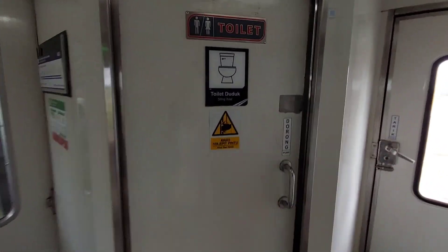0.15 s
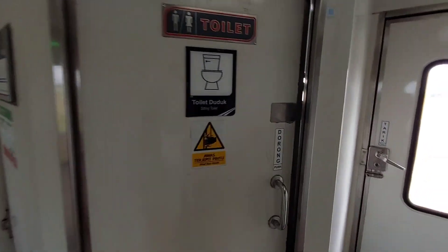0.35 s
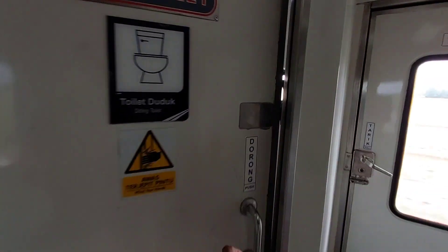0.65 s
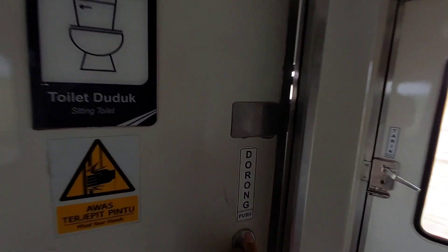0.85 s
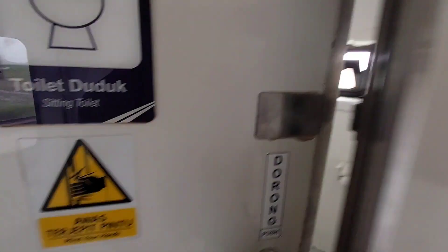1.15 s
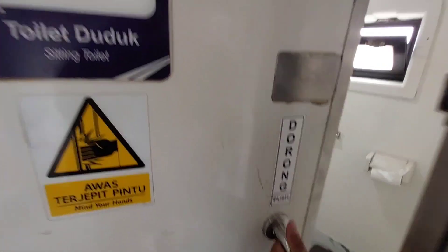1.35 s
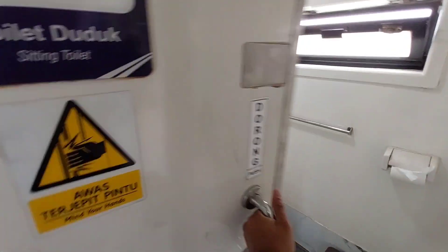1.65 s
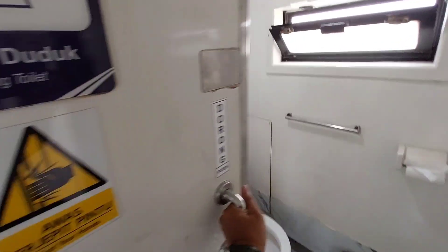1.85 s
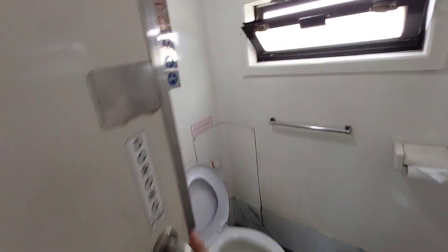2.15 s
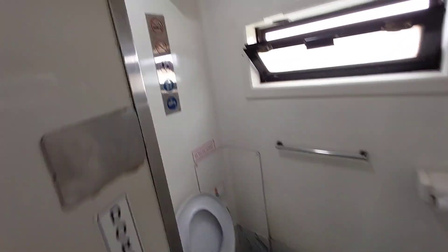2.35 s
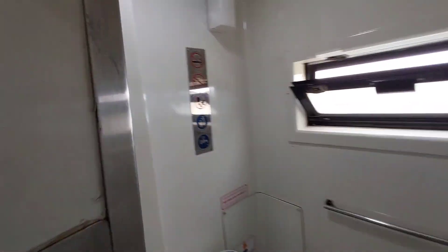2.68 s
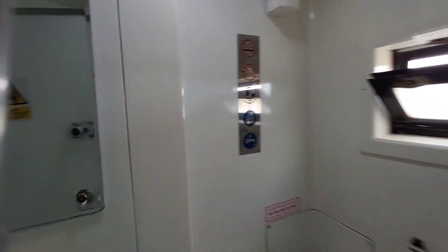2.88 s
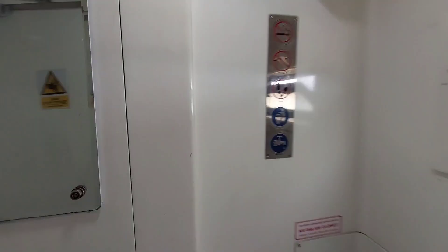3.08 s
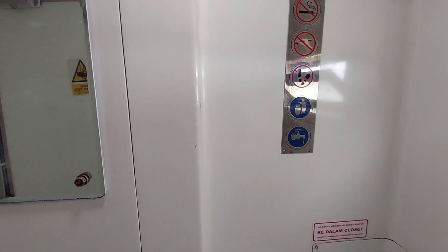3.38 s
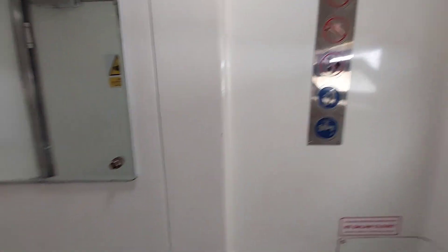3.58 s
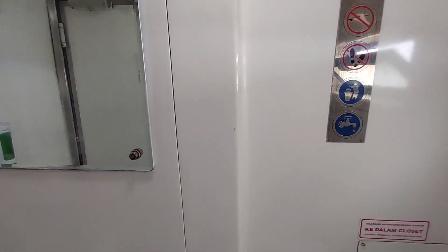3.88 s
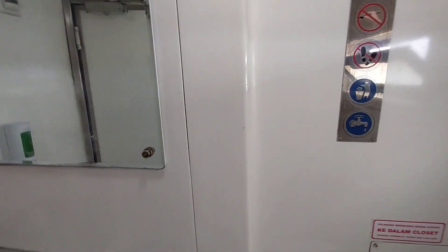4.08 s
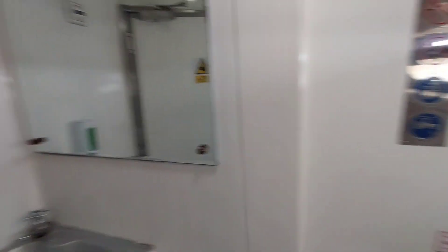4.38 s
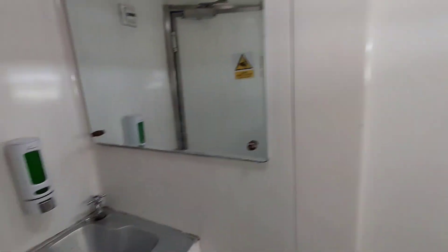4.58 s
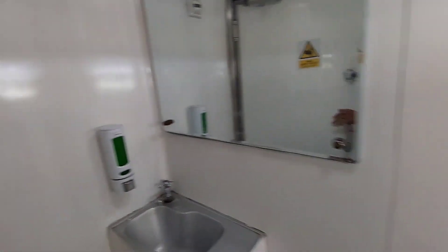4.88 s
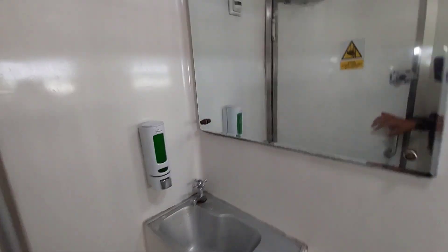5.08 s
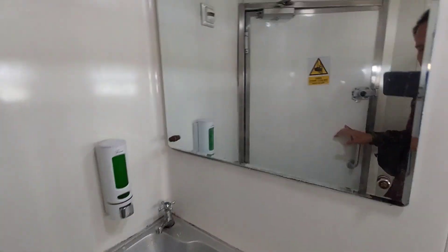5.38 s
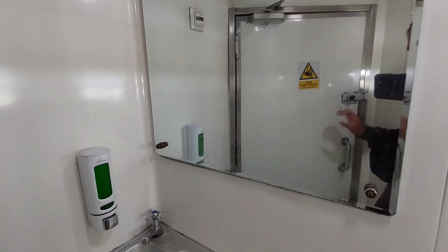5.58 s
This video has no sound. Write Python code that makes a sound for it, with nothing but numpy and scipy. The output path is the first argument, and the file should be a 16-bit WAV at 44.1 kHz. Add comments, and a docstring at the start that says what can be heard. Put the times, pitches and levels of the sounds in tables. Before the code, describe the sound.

Inside a moving train, wheels roar and panels thud and rattle as someone pushes through a toilet door, then a steel latch snaps sharply.

```python
"""A train runs on throughout: wheels roar, wall panels drone, the car body booms under the floor.
Jolts thud in the panels and rattle steel fittings; rubs and drags of a door come and go from the start.
From 2.0 to 2.75 s the listener walks from the vestibule into the toilet cubicle: the boom grows, a rustle
sets in and the room briefly sings. From 3.4 s a steel latch snaps now and then in the small hard room.
Shaped noise makes all but the singing and the latch ring, which are sines; two ports pick it up."""
import sys
import numpy as np
from scipy import signal
from scipy.fft import rfft, irfft
from scipy.io import wavfile
from scipy.ndimage import uniform_filter1d, minimum_filter1d

SR = 44100
rng = np.random.default_rng(int(sys.argv[2]) if len(sys.argv) > 2 else 0)


def wav_out(sig):
    """Save sig, one row per channel (or a flat mono array), as 16-bit PCM at SR to the path in sys.argv[1]."""
    wavfile.write(sys.argv[1], SR, np.round(np.clip(np.atleast_2d(sig).T, -1, 1) * 32767).astype(np.int16))


N = 252693
TIME = np.arange(N) / SR
HIT = TIME[:SR * 3 // 4]  # time axis of one short event


# Track roughness as the walls feel it. Each row: time in seconds, level in dB before drone_db.
TRACK_DB = [(0.0, -21.5), (0.29, -23), (1.39, -22), (1.53, -15), (2.42, -23), (3.11, -28), (3.57, -25),
            (3.88, -32), (4.15, -43), (4.29, -22), (4.76, -27.5), (5.73, -26)]
# Wheel roar, lower as the outer door is left behind. Each row: time in seconds, level in dB before roar_db.
ROAR_DB = [(0.0, -31.5), (0.64, -30), (2.62, -36.5), (4.48, -35), (5.33, -37), (5.73, -35)]
# Spectrum of the wheel roar. Each row: frequency in Hz, density in dB per Hz.
ROAR_COLOUR = [(40, -15), (120, -0.5), (420, 2.5), (700, 1.5), (1000, -0.5), (1400, -4.5), (1850, -7),
               (2120, 1), (2650, -5.5), (3300, -15.5), (5500, -19.5), (7000, -28.5), (9500, -32),
               (16000, -35)]


def running(drone_db=-0.5, roar_db=7, flutter_db=1.0, flutter_per_s=28):
    """The track shakes the wall panels; the wheel roar flutters over them."""
    inside = place(TIME)
    vestibule = diffuse(panels(0, N), N)
    cubicle = diffuse(panels(1, N), N)
    crossfade = np.sqrt(1 - inside) * vestibule + np.sqrt(inside) * cubicle
    drone = steadied(crossfade, 0.19) * curve(TRACK_DB)
    flutter = undb(flutter_db * walk(flutter_per_s))
    roar = diffuse(undb(along(ROAR_COLOUR, N)), N) * curve(ROAR_DB) * flutter
    return undb(drone_db) * drone + undb(roar_db) * roar


# Wall panels. Each row: frequency in Hz, half-width at half gain in Hz, relative level in dB in the
# vestibule, relative level in dB in the cubicle.
PANELS = [(93.7, 6.7, -3.5, 0), (153.1, 13.2, 0.5, -8.5), (187.4, 23.4, -3.5, -16.5), (243, 7.4, -2, -5),
          (263, 22, 0.5, -1), (289.7, 5.4, 2, 4), (315.6, 19, 0, -21), (348, 31, -8.5, -3),
          (430, 6.1, -31, -3), (640, 43, -19, -43), (917, 207, -27, -27.5)]


def panels(inside, n):
    """Wall resonances at a place between the vestibule (0) and the cubicle (1)."""
    modes = [(hz, width_hz, out_db + inside * (in_db - out_db)) for hz, width_hz, out_db, in_db in PANELS]
    return resonances(modes, n)


# Walk through the doorway. Each row: time in seconds, share of the cubicle from 0 to 1.
DOORWAY_WALK = [(0, 0), (2.0, 0), (2.75, 0.99), (5.73, 1)]


def place(s):
    """Share of the cubicle at time s."""
    return np.clip(np.interp(s, *np.transpose(DOORWAY_WALK)), 0, 1)


# Bending of the car body. Each row: frequency in Hz, half-width at half gain in Hz, relative level in dB.
BODY_MODES = [(54.8, 6.5, -3), (70.4, 1.7, 0), (106.7, 28.3, -11.5)]


def body_boom(vestibule_db=-34.5, cubicle_db=-22.5):
    """Bending modes of the car body boom under the floor, louder in the small cubicle."""
    level_db = vestibule_db + (cubicle_db - vestibule_db) * np.sqrt(place(TIME))
    return steadied(diffuse(resonances(BODY_MODES, N), N), 0.31) * undb(level_db)


# Jolts. Each row: start in seconds, panel thud in dB, thud centre in Hz, steel clank in dB,
# length of the chatter in seconds.
JOLTS = [(.15, -19, 280, -45, 0.023), (.57, -24.5, 400, -21, 0.028), (.645, -18, 960, -16, 0.052),
         (0.751, -15, 307, -23, 0.019), (.826, -17.5, 950, -15, .04), (.885, -22, 790, -23, .03),
         (1.322, -14, 187, -23.5, 0.017), (1.366, -9.5, 287, -18.5, 0.059), (1.54, -15.5, 327, -19, .041),
         (1.805, -12, 274, -18.5, 0.032), (1.882, -9.5, 243, -15.5, 0.042), (2.072, -11.5, 300, -21, 0.016),
         (2.278, -15, 330, -47, 0.034), (2.671, -13, 254, -27, 0.012), (2.87, -17, 242, -43, 0.0061),
         (3.374, -26, 805, -24, 0.016), (3.411, -17.5, 290, -32, 0.034), (3.645, -21, 326, -25.5, 0.027),
         (4.103, -13, 383, -33, .012), (4.177, -11, 402, -17, 0.032), (4.273, -17, 280, -30, .02),
         (4.41, -21.5, 182, -30, 0.058), (5.03, -21.5, 320, -26.5, 0.033),
         (5.116, -10.5, 280, -28.5, 0.018)]
# Spectrum of the steel fittings. Each row: frequency in Hz, density in dB per Hz.
CLANK_COLOUR = [(150, -30), (450, 10.5), (580, 4), (850, 4), (1230, -9), (1800, -6), (2200, 0.5),
                (2700, -10.5), (3400, -19.5), (5500, -28), (8000, -36.5), (16000, -40)]


def jolts(thud_t60_s=0.23, room_t60_s=0.45, reach_octaves=0.66):
    """Each jolt thuds in the panels near its own pitch and makes steel fittings chatter into the room."""
    out, n = np.zeros((2, N)), len(HIT)
    for s, thud_db, hz, clank_db, length_s in JOLTS:
        nearness = np.exp(-.5 * (np.log2(bins(n) / hz) / reach_octaves) ** 2)
        excited = panels(place(s), n) * nearness
        # build up for half the chatter, hold to its end, ring out
        build_up = np.minimum(HIT / length_s * 2, 1)
        ring_out = np.minimum(fade(thud_t60_s) * undb(60 * length_s / thud_t60_s), 1)
        thud = steadied(diffuse(excited, n), 0.021) * build_up * ring_out
        steel = diffuse(undb(along(CLANK_COLOUR, n)), n) * fade(room_t60_s)
        clank = unit_peak(signal.fftconvolve(steel, chatter(length_s))[:, :n])
        add(out, s, undb(thud_db) * thud + undb(clank_db) * clank)
    return out


def chatter(length_s, count=40):
    """Contact force of a loose part: a flurry of blows that grow weaker."""
    force = np.zeros(int(length_s * SR) + 1)
    when = (np.arange(count) + rng.random(count)) / count
    blows = rng.standard_normal(count) * (1 - .5 * when)
    force[(when * length_s * SR).astype(int)] = blows
    return force[None]


# Latch and bolt. Each row: start in seconds, level in dB, brightness in dB per octave,
# ring in dB re level, direct crack in dB re level.
LATCH_SNAPS = [(3.374, -13.5, -7, -28, -14), (3.414, -9, 1, -25, -5), (3.422, -19.5, -3.5, -25, -16),
               (3.676, -23.5, -0.5, -19, -2), (3.7227, -13, 0, -11, -4), (4.472, -32, 7, -31, 3),
               (5.6365, -26, 5, -32, 7.5)]
# Spectrum of a snap. Each row: frequency in Hz, density in dB per Hz.
LATCH_COLOUR = [(300, -1), (1500, -3.5), (2400, 0), (3700, -5.5), (5300, -2), (6800, -5.5), (8300, -1.5),
                (12000, -4), (14300, -11), (15500, -11.5)]
# Ring of the latch steel. Each row: frequency in Hz, level in dB, t60 in seconds.
LATCH_MODES = [(4900, -7, 0.37), (5518, -10, .39), (8344, -8, .24), (9555, -7, 0.36), (11100, -6, .28),
               (11260, -8, .24), (12400, -6, .25), (13670, -3, .26), (15230, -9, .26)]


def latch(tail_t60_s=0.25, crack_t60_s=0.0061, uneven_db=4.0):
    """Steel snaps on steel: a crack, a short ring and dense reflections off the cubicle walls."""
    out, n = np.zeros((2, N)), len(HIT)
    octaves = np.log2(np.maximum(bins(n), 1000) / 8000)
    for s, db, tilt_db, ring_db, crack_db in LATCH_SNAPS:
        # every contact point favours other modes of the lock case
        uneven = uneven_db * ripple(n, 150.0, channels=1)
        colour = undb(along(LATCH_COLOUR, n) + tilt_db * octaves + uneven)
        walls = diffuse(colour, n) * fade(tail_t60_s)
        # one channel: the direct crack reaches both ports alike
        crack = diffuse(colour, n)[0] * fade(crack_t60_s)
        ring = np.zeros((2, n))
        for hz, mode_db, t60_s in LATCH_MODES:
            ring += undb(mode_db) * fade(t60_s) * np.sin(2 * np.pi * (hz * HIT + rng.random((2, 1))))
        add(out, s, undb(db) * (walls + undb(crack_db) * crack + undb(ring_db) * ring))
    return out


# Door on its frame. Each row: start in seconds, level in dB, length in seconds.
DRAGS = [(0.795, -32, 0.22), (1.267, -31, 0.086), (1.787, -31.5, 0.22), (2.034, -28, 0.25),
         (4.34, -30.5, 0.23)]
# Ring of the dragging door. Each row: frequency in Hz, half-width at half gain in Hz, relative level in dB.
DOOR_MODES = [(2050, 160, -3), (2490, 250, -2), (3900, 1100, -18.5)]


def drags(grain_db=2, grain_per_s=110):
    """The door slips in small jerks along its frame and rings in its own modes."""
    rasp = diffuse(resonances(DOOR_MODES, N), N) * undb(grain_db * walk(grain_per_s))
    speed = np.zeros(N)
    for s, db, length_s in DRAGS:
        speed += undb(db) * np.sin(np.pi * np.clip((TIME - s) / length_s, 0, 1))
    return rasp * speed


# Strokes of clothes and hand on the door. Each row: start in seconds, level in dB,
# length before release in seconds.
RUBS = [(0, -33.5, 0.12), (0.583, -41, 0.33), (2.26, -38.5, 0.088), (2.684, -40.5, 0.18),
        (3.43, -33.5, 0.22), (4.097, -34.5, 0.32), (4.17, -30, 0.041), (4.35, -38, 0.055),
        (4.855, -45, 0.092), (5.19, -46, 0.075)]
# Spectrum of the rubbing. Each row: frequency in Hz, density in dB per Hz.
RUB_COLOUR = [(500, 6.5), (2400, 10.5), (3800, 5.5), (5800, 2), (7500, -3.5), (9500, -10), (12000, -4.5),
              (16000, -23)]


def rubbing(attack_s=0.023, release_s=0.078, rustle_db=-42.5, grain_db=1.0, grain_per_s=90):
    """Uneven dry friction: separate strokes over a faint rustle that comes with the cubicle."""
    pressure = undb(rustle_db) * place(TIME)
    for s, db, length_s in RUBS:
        attack = np.clip((TIME - s) / attack_s, 0, 1)
        release = np.exp(-np.maximum(TIME - s - length_s, 0) / release_s)
        pressure = pressure + undb(db) * attack * release
    grain = undb(grain_db * walk(grain_per_s))
    return diffuse(undb(along(RUB_COLOUR, N)), N) * pressure * grain


# Standing waves. Each row: start in seconds, frequency in Hz, level in dB, length in seconds.
SWELLS = [(2.2, 65.2, -13.5, 0.14), (2.249, 237, -18, 0.15), (2.426, 246.6, -19, 0.24),
          (3.261, 69, -18.5, 0.16), (4.387, 56.2, -18, 0.13)]


def swells():
    """Air in the small room sings briefly at one of its own pitches."""
    out = np.zeros((2, N))
    for s, hz, db, length_s in SWELLS:
        arch = np.sin(np.pi * np.minimum(HIT / length_s, 1))
        tone = np.sqrt(2) * np.sin(2 * np.pi * (hz * HIT + rng.random((1, 1))))
        add(out, s, undb(db) * arch * tone)
    return out


def hard_walls(x, depth_db=1.48):
    """Close hard walls comb the middle and treble, differently at each port."""
    depth = depth_db * np.clip(bins(N) / 400 - .5, 0, 1)
    return irfft(rfft(x) * undb(depth * ripple(N, 22)), N)


def ripple(n, spacing_hz, channels=2):
    """Random peaks and dips along frequency, as dense modes make them; spread near 1."""
    knots = np.arange(0, SR / 2, spacing_hz)
    heights = 1.17 * rng.standard_normal((channels, SR // 4))
    return np.array([np.interp(bins(n), knots, row[:len(knots)]) for row in heights])


# Likeness of the two microphone ports. Each row: frequency in Hz, likeness (clipped to 0-1 after joining).
LIKENESS = [(60, 1.1), (130, 0.85), (300, 0.91), (640, 0.5), (1200, 0), (16000, 0)]


def diffuse(gain, n):
    """Sound from all sides with the given spectrum: the long waves reach both ports alike."""
    alike = np.clip(along(LIKENESS, n), 0, 1)
    mid, side = rfft(rng.standard_normal((2, n))) * gain * np.sqrt([1 + alike, 1 - alike])
    return unit(irfft([mid + side, mid - side], n))


def resonances(modes, n):
    """Gain of a group of resonances with steep skirts, summed in power."""
    power = 0
    for hz, width_hz, db in modes:
        power = power + (undb(db) / (1 + ((bins(n) - hz) / width_hz) ** 2)) ** 2
    return np.sqrt(power)


def steadied(x, span_s):
    """Even out the slow swells of a narrow-band sound."""
    window = np.hanning(int(span_s * SR))
    power = signal.fftconvolve(np.mean(x ** 2, axis=0), window, "same") / (span_s * SR / 2)
    return x / np.sqrt(power)


def walk(rate_per_s):
    """Random levels held 1 / rate_per_s and slewed; spread near 1."""
    k = int(SR / rate_per_s)
    held = np.repeat(rng.standard_normal(N // k + 1), k)
    return 0.67 * uniform_filter1d(held, k)[:N]


def fade(t60_s):
    """A ring that falls 60 dB in t60_s."""
    return np.exp(-np.log(1000) * HIT / t60_s)


def undb(db):
    """Decibels to gain."""
    return 10 ** (np.asarray(db) / 20)


def curve(rows):
    """Gain over time from (s, dB) rows."""
    return undb(np.interp(TIME, *np.transpose(rows)))


def unit(x):
    """Scale to rms 1."""
    return x / np.sqrt(np.mean(x ** 2))


def unit_peak(x, size=660):
    """Scale so that the loudest moment, size samples long, has rms 1."""
    return x / np.sqrt(uniform_filter1d(np.mean(x ** 2, axis=0), size).max())


def bins(n):
    """Frequencies in Hz of the spectrum of n samples, at least 1."""
    return np.maximum(np.fft.rfftfreq(n, 1 / SR), 1)


def along(points, n):
    """(Hz, value) points joined on a log-frequency axis."""
    hz, value = np.transpose(points)
    return np.interp(np.log(bins(n)), np.log(hz), value)


def add(out, s, x):
    """Mix x into out from time s."""
    i = int(s * SR)
    out[:, i:i + x.shape[1]] += x[:, :N - i]


def scene():
    """Running noise, jolts and door between hard walls, plus room swells and latch."""
    between_walls = body_boom() + running() + jolts() + rubbing() + drags()
    return hard_walls(between_walls) + swells() + latch()


def limit(x, ceiling=0.95, span_s=0.008):
    """Turn the gain down smoothly around peaks that pass the ceiling."""
    size = int(span_s * SR)
    gain = ceiling / np.maximum(np.abs(x).max(axis=0), ceiling)
    return x * uniform_filter1d(minimum_filter1d(gain, 2 * size), size)


# Colour of the two microphone ports. Each row: frequency in Hz, left minus right in dB.
PORTS = [(60, 1.6), (200, 2), (380, -1), (700, 2), (1290, -0.5), (2380, -5.5), (4400, -3), (8100, -2),
         (15000, 0.5)]


def record(dry, low_cut_hz=36, top_hz=15700):
    """Each port has its own colour; the phone cuts the deepest bass, limits the peaks and cuts the top."""
    balance = undb(along(PORTS, N) * np.array([[.5], [-.5]]))
    low_cut = 1 / np.sqrt(1 + (low_cut_hz / bins(N)) ** 8)
    limited = limit(irfft(rfft(dry) * balance * low_cut, N))
    top_cut = signal.ellip(10, .2, 80, top_hz, fs=SR, output="sos")
    return signal.sosfilt(top_cut, limited)


dry = scene()
out = record(dry)
wav_out(out)
```